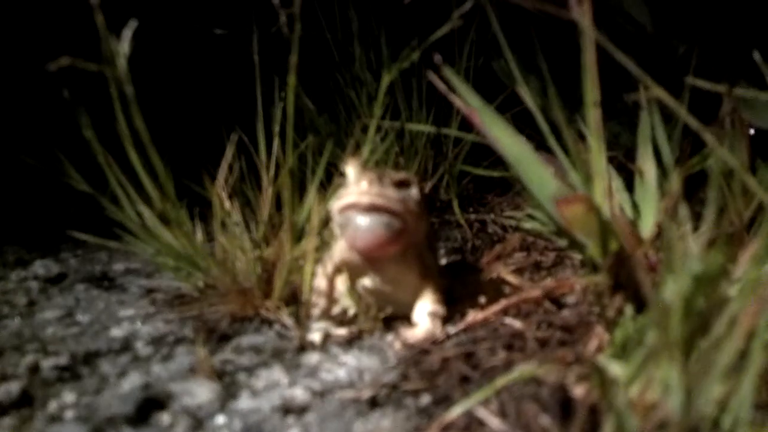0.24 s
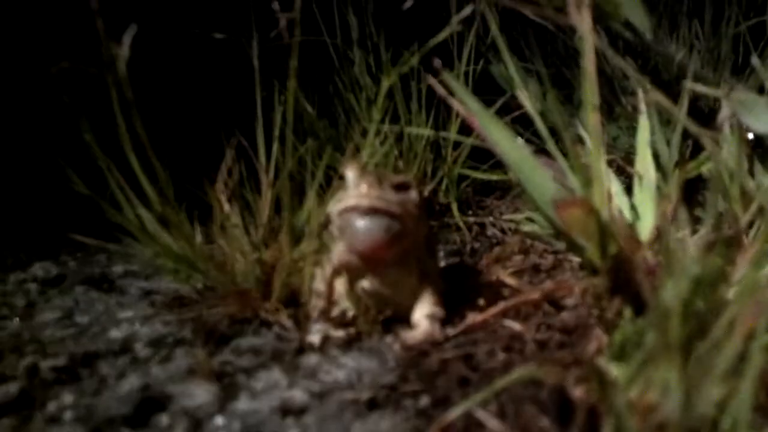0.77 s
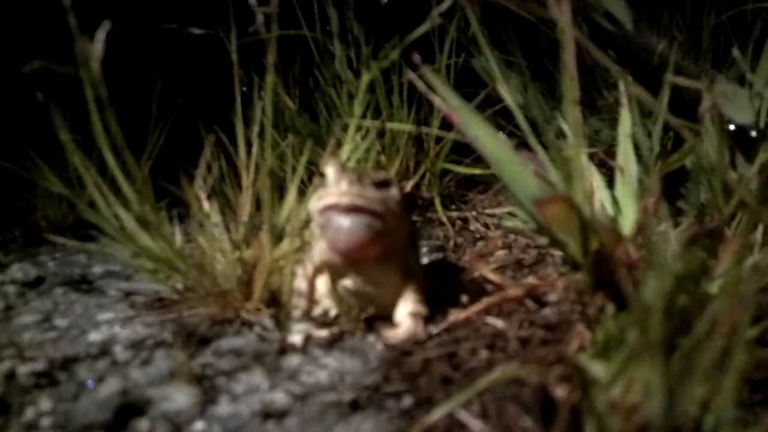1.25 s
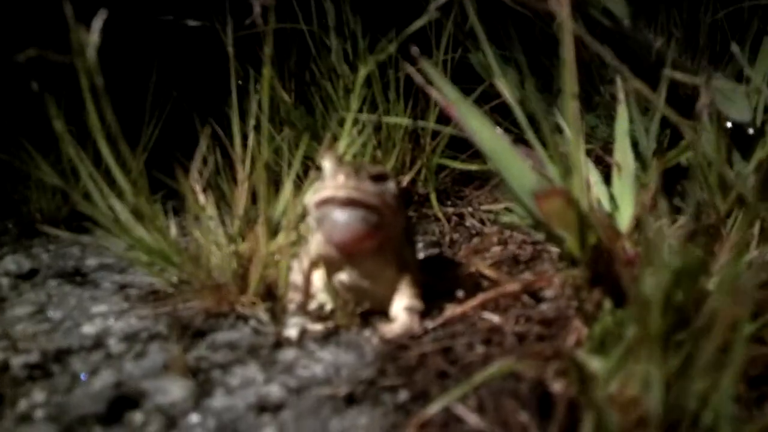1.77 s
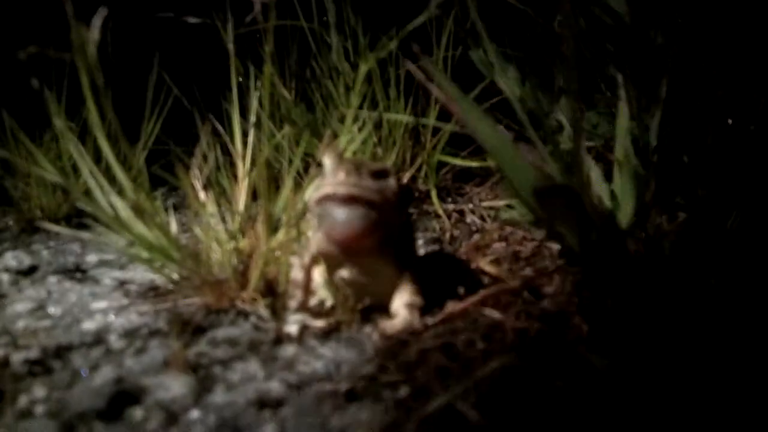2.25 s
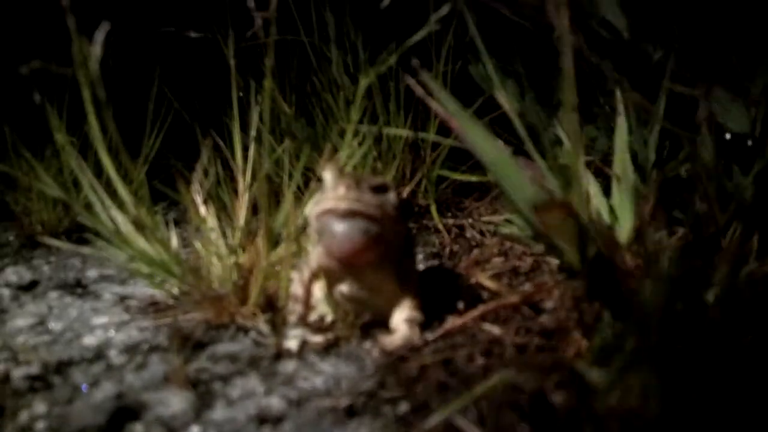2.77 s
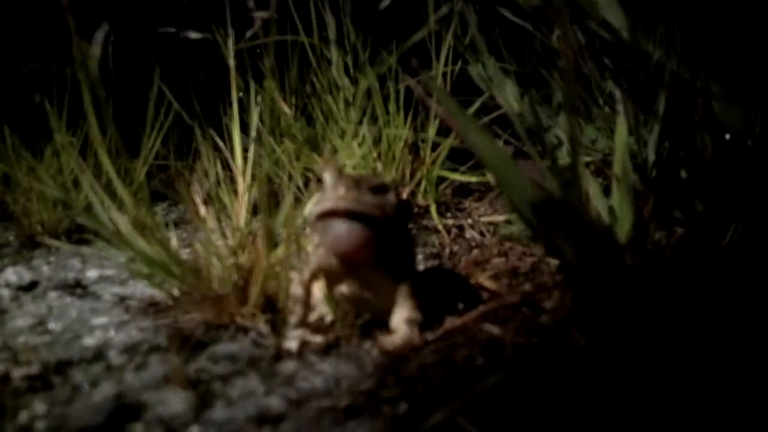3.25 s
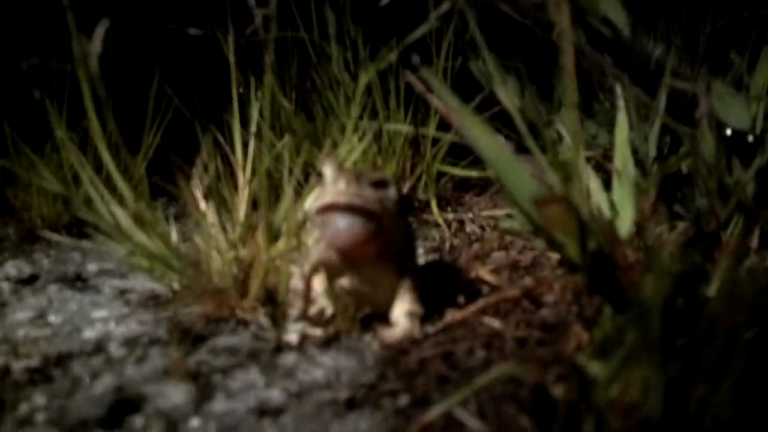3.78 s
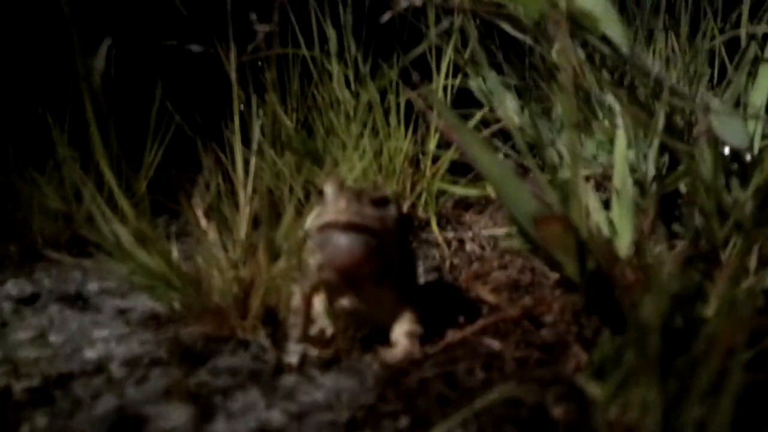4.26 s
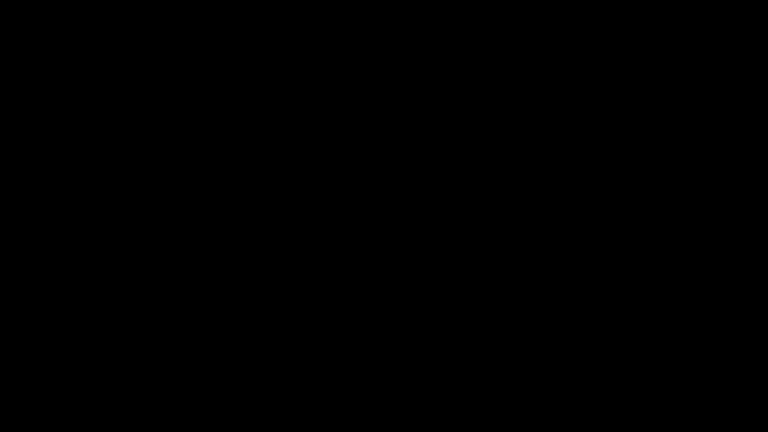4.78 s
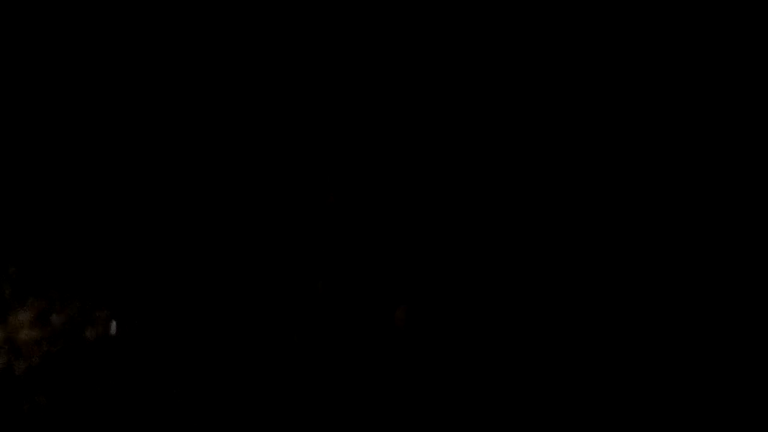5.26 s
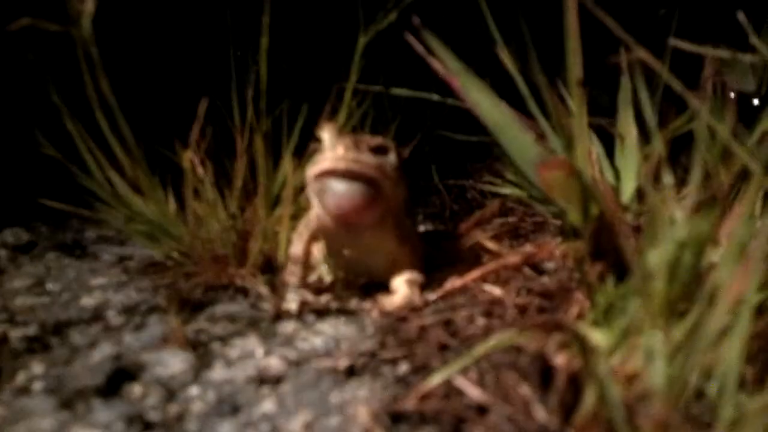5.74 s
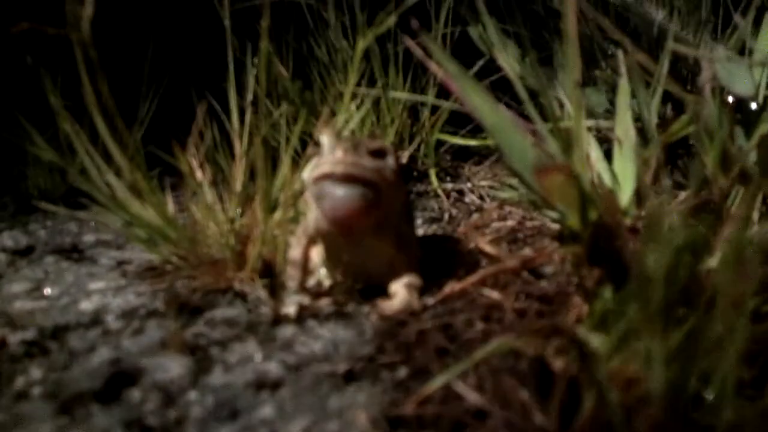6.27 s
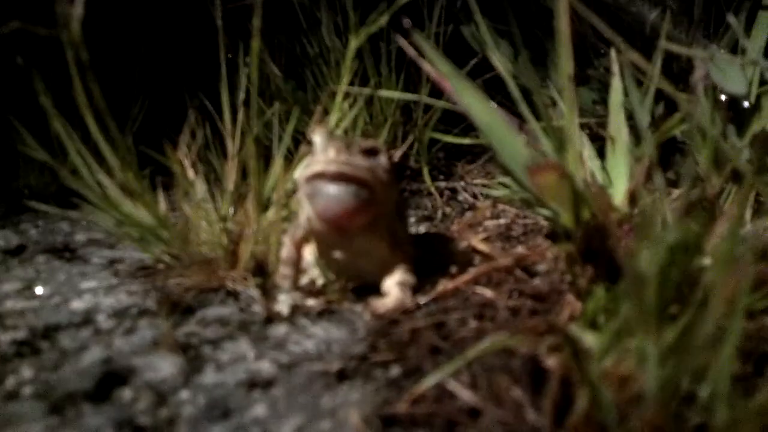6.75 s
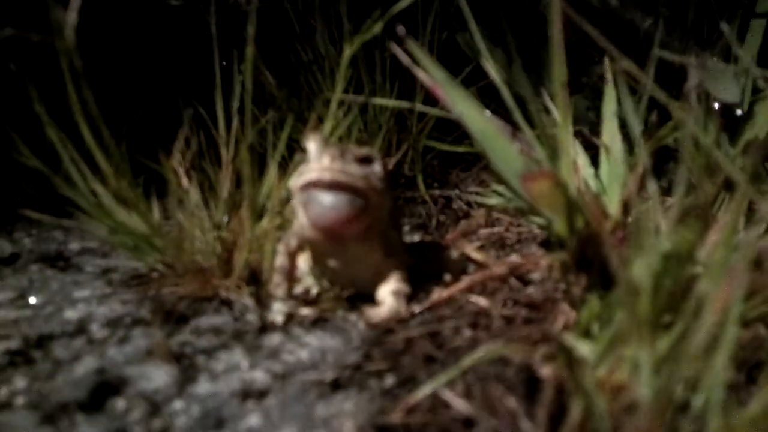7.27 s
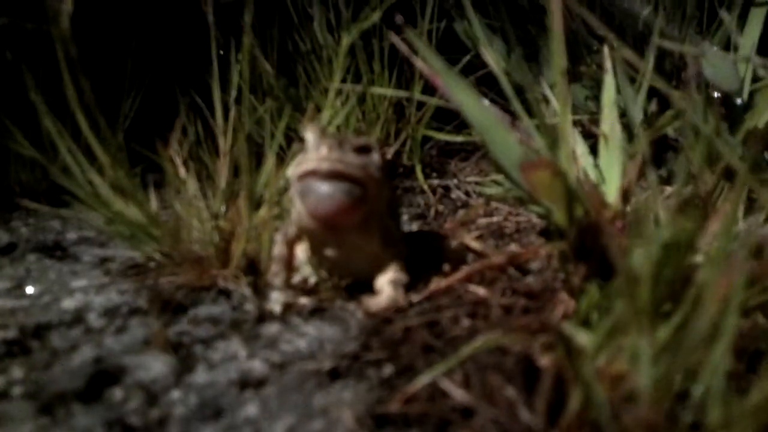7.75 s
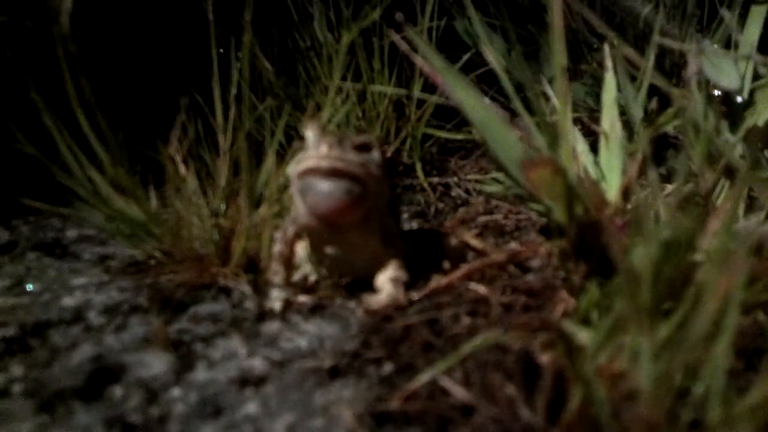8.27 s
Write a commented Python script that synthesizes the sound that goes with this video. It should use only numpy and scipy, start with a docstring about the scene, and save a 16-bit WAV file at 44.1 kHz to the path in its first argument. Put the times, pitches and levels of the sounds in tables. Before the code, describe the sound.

Continuous high insect trill, hissing katydids and throbbing far toads outdoors at night, with a faint motor-like drone and handheld torch clicks and bumps.

```python
"""A near cricket pulses through a night in wet grass: each wing stroke is a short tone that sags at its end.
Behind it are toads, katydids and far crickets, made of coloured noise that flickers and surges.
A low rumble is noise too; wavering drones and hums, likely far motors, are sine waves.
A hand clicks a torch and rubs its case, and soft bumps come before and between the clicks: dying
sines and bursts of noise. Two ports hear it; each channel is one port minus the other a moment later."""
import sys
import numpy as np
from scipy import signal
from scipy.fft import rfft, irfft, next_fast_len
from scipy.io import wavfile
from scipy.ndimage import uniform_filter1d

SR = 44100
rng = np.random.default_rng(int(sys.argv[2]) if len(sys.argv) > 2 else 0)


def store_pcm(level_fs):
    """Save levels as 16-bit WAV."""
    pcm = np.round(np.clip(level_fs, -1, 1) * 32767).astype(np.int16)
    wavfile.write(sys.argv[1], SR, np.atleast_2d(pcm).T)


N = 375732
TIME = np.arange(N) / SR

# Noise colours at the ports; only their shape counts, as the loudness is set later:
# (frequency [Hz], density [dB per Hz], left minus right port [dB], likeness of the ports [-1..1])
RUMBLE_COLOUR = [(113, -90.5, 3, 0.57), (134.4, -72, -2, 0.29), (141, -80.5, -1, .85),
                 (153, -70, -0.5, 0.8), (204, -74, -4.5, 0.56), (282, -75, 4.5, 0.41),
                 (395, -81, 4.5, 0.43), (477, -73.5, -9, 0.69), (544, -79, 3, 0.021),
                 (687, -76.5, -0.5, 0.034), (762, -88, 2, 0.58), (974, -86, -3, -0.54),
                 (1193, -88.5, 2, -0.5)]
DEEP_RUMBLE_COLOUR = [(29.8, -93, 0.29, .97), (70, -78, 0.33, 0.99), (105, -69.5, 1.4, 0.85),
                      (140.3, -73, 1, 0.85)]
TOAD_COLOUR = [(1190, -90, -7, 0.55), (1690, -85.5, -3, 0.44), (1930, -77, -0.5, 0.25),
               (2240, -81.5, -6.5, 0.44), (2410, -85.5, 26, 0.071), (2950, -80.5, -17, 0.16),
               (3800, -85, 0, 0.2), (4450, -82.5, 1.5, 0.13), (5070, -86.5, -4, 0.13),
               (5340, -85.5, 2.5, 0.11)]
FAR_CRICKET_COLOUR = [(5500, -91.5, 1, .1), (5830, -89.5, 3, 0.35), (6070, -85.5, 2.7, 0.24),
                      (6910, -99.5, 3.9, .1), (6920, -112, 1, .1)]
KATYDID_COLOUR = [(7930, -118, -17, 0.024), (8420, -116, -8, 0.013), (9710, -107.5, -35.5, 0.),
                  (11500, -105, -8.5, 0.011), (11740, -96.5, -18, 0.03), (13600, -90, -17.5, 0.),
                  (15200, -83, -16, 0.), (15500, -83.5, -18, 0.0044)]

# How the rumble swells: (time [s], level [dB])
RUMBLE_SWELL = [(0, -53.5), (0.9, -51.5), (2.5, -52.5), (4, -53.5), (6.2, -51), (7.4, -52.5), (8.52, -55)]
DEEP_RUMBLE_DB, DEEP_RUMBLE_RISE_DB_PER_S = -69, 0.27

# Pitch of the falling drone: (time [s], fundamental [Hz])
DRONE_PITCH = [(0, 86), (2.1, 85.5), (4, 84.5), (6.3, 83.5), (8.52, 81.5)]
# Its second partial: (time [s], level [dB])
DRONE_SECOND_SWELL = [(0, -61), (0.4, -66), (0.95, -62.5), (1.14, -56), (1.45, -58.5), (2.05, -51),
                      (2.35, -58), (2.55, -52.5), (3.2, -68), (3.7, -62), (3.95, -56), (4.4, -56),
                      (4.8, -57.5), (5.3, -62.5), (5.65, -56), (6.0, -64.5), (7.0, -69), (7.8, -55.5),
                      (8.3, -65), (8.52, -59)]
# Its fourth and sixth partials: (time [s], level of the fourth [dB], level of the sixth [dB])
DRONE_UPPER_SWELL = [(0, -68, -69), (0.5, -66, -61), (0.85, -54.5, -60), (1.15, -67, -59),
                     (1.6, -56, -60.5), (2.1, -65, -64), (2.5, -70, -70), (2.9, -62.5, -57),
                     (3.5, -66.5, -62), (4.2, -66, -73), (4.8, -63, -80), (5.2, -60.5, -73),
                     (5.45, -70, -72), (5.7, -61, -76), (6.1, -68, -66), (7, -70.5, -59), (8.52, -73, -83)]
# Its highest partials: (multiple of the fundamental, level [dB])
DRONE_HIGH_PARTIALS = [(7, -71), (8, -67), (9, -72)]
# The steady drone's partials, before its swell: (multiple of the fundamental, level [dB])
STEADY_PARTIALS = [(2, -64.5), (4, -71.5), (6, -67), (8, -71.5)]
STEADY_HZ = 75.33
# How the steady drone swells: (time [s], level added to every partial [dB])
STEADY_SWELL = [(0, 3), (0.25, 7.5), (0.7, -2.5), (1.15, 6.5), (1.5, -6), (2.0, 3.5), (2.6, 1.5),
                (2.9, 0.5), (3.4, 5.5), (3.8, -1), (4.4, 0.5), (5.2, -7.5), (6.2, -1), (7.4, 2), (8.52, 2)]
# Two lone hums that come and go: (time [s], low hum level [dB], high hum level [dB])
HUM_SWELL = [(0, -71, -76), (0.5, -70, -61), (1.0, -70, -58), (1.7, -74, -68), (2.0, -67.5, -71),
             (3.0, -70, -59), (3.5, -74, -75), (4.2, -66.5, -72), (5.3, -68, -68), (6.0, -67, -75),
             (6.6, -69, -64), (7.3, -64, -69.5), (8.0, -61.5, -66), (8.52, -62, -64)]
HUM_HZ = (132.1, 252)  # low, high
WAVER_DB = 3  # the faint lines break up

# Surges of the chorus, when nearer katydids join in and sing across the treble and the middle band: # (start
# [s], length [s], treble level [dB], middle band level [dB])
SURGES = [(0.07, 0.49, -56.5, -52), (0.675, 0.41, -57, -50.5), (1.25, 0.59, -66, -58.5),
          (1.778, 0.54, -56, -50.5), (2.501, 0.98, -62.5, -55), (3.367, 0.49, -58, -54),
          (4.003, 1.13, -60, -54), (5.156, 0.48, -57.5, -54.5), (5.644, 0.47, -73, -53),
          (6.363, 0.49, -57, -52), (6.98, 0.42, -75, -53.5), (7.465, 0.51, -65, -53),
          (8.093, 0.52, -58.5, -53)]
SURGE_RISE_S, SURGE_FALL_S = 0.14, 0.21
KATYDID_BED_DB, TOAD_BED_DB, FAR_CRICKET_DB = -61, -51, -59
TOAD_THROB_DB, TOAD_THROB_PER_S = 1.3, 15  # random throb: spread, new levels a second

# Torch clicks, each with its own pitch and ring time:
# (time [s], snap level [dB], knock level [dB], tick level [dB],
#   snap at the right port as a share of the left [-1..1], knock likewise [-1..1],
#   knock pitch [factor], knock ring time [factor])
CLICKS = [(4.378, -35, -33, -46, .36, 0.7, 1.4, 0.58), (4.93, -40, -38, -48, .3, .6, 1.3, 0.35),
          (4.937, -36, -35.5, -45, .31, 0.54, 2.15, 0.23), (4.947, -44, -41, -48, .3, .6, 1., .4),
          (4.956, -45, -37, -56, .3, .6, 0.86, .5), (4.967, -45, -42, -52, .3, .6, 1.2, .4),
          (4.9832, -39, -36, -45, .2, 0.55, 1.2, .25), (5.009, -39, -27.5, -40, .1, .6, 0.81, 0.35),
          (5.5846, -29.5, -32.5, -44, 0.18, 0.32, 1.92, 0.38),
          (6.1548, -32, -27, -35, .3, 0.62, 1.24, 0.33), (6.1572, -31, -40, -44, .1, .6, 1.2, .4),
          (6.1622, -35, -27, -31, .2, 0.48, 1.6, 0.42), (6.1675, -22.5, -27.5, -35, 0.28, 0.66, 1.06, 0.93),
          (6.181, -42, -43, -47, .2, .6, 1.5, .4), (6.1881, -18.5, -22, -38, -.25, 0.56, 1.05, 0.4),
          (6.1935, -32, -39, -46, .2, .3, 1.5, 0.44), (6.197, -24, -45, -34, .1, .6, 1.4, 0.45),
          (6.2031, -36, -29, -39, .2, 0.65, 0.48, .8), (6.224, -44, -35, -56, .2, 0.5, 0.99, 0.97)]
# Ringing of the snap: (frequency [Hz], level [dB], time to die by 60 dB [s])
SNAP_MODES = [(2755, -2.5, 0.014), (2144, -8.5, 0.012), (3960, -6.5, 0.0063), (5800, -6, 0.005)]
# Ringing of the knock before the factors: (frequency [Hz], level [dB], time to die by 60 dB [s])
KNOCK_MODES = [(573, -8, 0.038), (499, 8, 0.028), (421, 19, 0.025)]
# Soft bumps: (time [s], peak level at the left port [dB])
BUMPS = [(1.673, -35), (4.378, -41), (5.008, -36), (5.086, -48), (5.156, -38), (5.748, -39)]
# Ringing of a bump: (frequency [Hz], level [dB], time to die by 60 dB [s])
BUMP_MODES = [(249, 7, 0.069), (312, 0, 0.035), (182, -4, 0.063)]
# Fingers sliding on the case:
# (time [s], length [s], level [dB], top of the dull part [Hz], gain of the added treble [dB])
RUSTLES = [(0.982, 0.069, -52.5, 1800, -45), (4.357, 0.033, -52, 1500, -18),
           (4.915, 0.12, -53.5, 2100, -13), (6.14, 0.035, -48.5, 1190, 3), (6.185, 0.022, -45, 1000, -6)]
TREBLE = signal.butter(1, 5000, "highpass", fs=SR, output="sos")  # ticks and rubbing are thin and bright

# The near cricket: (time [s], level [dB], pulses ahead of the steady beat [cycles])
CRICKET_SONG = [(0, -50, 0.06), (1, -49, 0.07), (1.5, -50, 0.064), (1.9, -49, 0.014), (2.75, -48.5, 0.045),
                (3.75, -49, 0.0045), (4.25, -48.5, 0.0044), (5.1, -49, .007), (5.75, -49.5, 0.026),
                (6.15, -49.5, 0.07), (6.4, -49.5, 0.092), (7.25, -48.5, 0.077), (7.75, -49.5, 0.075),
                (8.52, -49, 0.0016)]
CRICKET_RATE_HZ, CRICKET_FIRST_S = 43.72, 0.0050
# One wing stroke before its random changes: (time from its start [s], level [dB], pitch [Hz])
STROKE = [(0., -40, 6430), (.0009, -15, 6430), (.0018, -5, 6420), (.0028, -2.5, 6405), (.0047, 0, 6390),
          (.0064, 0, 6355), (.0078, -1, 6300), (.0088, -3.5, 6230), (.0097, -7, 6160), (.0107, -13, 6130),
          (.012, -26, 6120)]
STROKE_SCATTER_DB, STROKE_STRETCH = 0.85, 0.045  # spread of strength and of length between strokes

PORT_DELAY = 16  # samples
TOP_HZ = 15500


def undb(db):
    """Turn decibels into gain."""
    return 10 ** (np.asarray(db) / 20)


def curve(rows):
    """Draw straight lines through each column of a time table, one value a sample."""
    s, *columns = np.transpose(rows)
    return [np.interp(TIME, s, column) for column in columns]


def walk(rate):
    """Wander at random: about `rate` new levels a second, smoothed twice, with a spread near 1."""
    hold = int(SR / rate)
    steps = np.repeat(rng.standard_normal(N // hold + 1), hold)
    smooth = uniform_filter1d(uniform_filter1d(steps, hold), hold)
    return 0.94 * smooth[:N]


def widen(ports):
    """Take from each port the other port a moment earlier, which makes a comb of notches."""
    return ports - np.roll(ports[::-1], PORT_DELAY, axis=1)  # the other port is delayed


def level(ports, db):
    """Bring the centre of the widened pair to rms 1, then apply the level."""
    centre = widen(ports).mean(axis=0)
    return ports * undb(db) / np.sqrt(np.mean(centre ** 2))


def hiss(colour, flicker_db, rate, lag_s=0):
    """Coloured noise, lag_s later at the left port; the band round each table row flickers on its own."""
    size = next_fast_len(N)
    hz, db, pan_db, like = np.transpose(colour)
    bin_hz = np.maximum(np.arange(size // 2 + 1) * SR / size, 1)
    at, rows_at = np.log(bin_hz), np.log(hz)
    gain = undb(np.interp(at, rows_at, db))
    pan = np.interp(at, rows_at, pan_db)
    like = np.interp(at, rows_at, np.clip(like, -1, 1))
    # a shared part and an opposite part set how alike the ports are
    mid, side = rfft(rng.standard_normal((2, size)))
    mid, side = mid * np.sqrt(1 + like), side * np.sqrt(1 - like)
    left = undb(pan / 2) * (mid + side) * np.exp(-2j * np.pi * bin_hz * lag_s)
    right = undb(-pan / 2) * (mid - side)
    spectra = gain * np.array([left, right])
    out = np.zeros((2, N))
    for one in np.eye(len(hz)):
        band = np.interp(at, rows_at, one, left=0, right=0)
        out += undb(flicker_db * walk(rate)) * irfft(spectra * band, size)[:, :N]
    return out


def ring(modes, rise_s, count=2600):
    """Dying sines after a push that builds up over about rise_s, with peak 1."""
    t = np.arange(count) / SR
    y = sum(undb(db) * np.sin(2 * np.pi * hz * t) * 1000. ** (-t / t60) for hz, db, t60 in modes)
    y = y * (1 - np.exp(-t / rise_s)) ** 2
    return y / np.abs(y).max()


def add(ports, s, sound):
    """Mix a short sound in at time s."""
    i = int(s * SR)
    ports[:, i:i + sound.shape[1]] += sound


def rumble():
    """Low noise that swells, over a deepest layer that slowly grows and wavers."""
    swelling = level(hiss(RUMBLE_COLOUR, 1.35, 6), curve(RUMBLE_SWELL)[0])
    deep_db = DEEP_RUMBLE_DB + DEEP_RUMBLE_RISE_DB_PER_S * TIME + 1.3 * walk(3.3)
    return swelling + level(hiss(DEEP_RUMBLE_COLOUR, 0.77, 2.5), deep_db)


def partial(turns, db, waver_db, wander, lag_s):
    """One sine line that wavers in level and phase and reaches the right port later."""
    phase = 2 * np.pi * turns + wander * walk(8)  # wander in radians
    lag = np.gradient(phase) * SR * lag_s
    ports = np.array([np.sin(phase), np.sin(phase - lag)])
    return level(ports, db + waver_db * walk(9))


def falling_drone():
    """A slowly falling stack of sine lines; the second partial wanders least."""
    turns = np.cumsum(curve(DRONE_PITCH)[0]) / SR
    out = partial(2 * turns, curve(DRONE_SECOND_SWELL)[0], 1.6, 0.4, lag_s=0.00014)
    for k, db in zip((4, 6), curve(DRONE_UPPER_SWELL)):
        out += partial(k * turns, db, WAVER_DB, 0.55 * k, lag_s=0.0001)
    for k, db in DRONE_HIGH_PARTIALS:
        out += partial(k * turns, db, 4.8, 1.67, lag_s=0.00025)
    return out


def steady_drone():
    """Partials of one fixed pitch that swell together and waver apart."""
    swell_db = curve(STEADY_SWELL)[0]
    return sum(partial(k * STEADY_HZ * TIME, db + swell_db, 2.5, 1.16, lag_s=0.0001)
               for k, db in STEADY_PARTIALS)


def hums():
    """Two lone sine lines that come and go, each at its own pitch."""
    return sum(partial(hz * TIME, db, WAVER_DB, 2.05, lag_s=0.00014)
               for hz, db in zip(HUM_HZ, curve(HUM_SWELL)))


def far_crickets():
    """Far singers blur into a band of fast flickering noise."""
    return level(hiss(FAR_CRICKET_COLOUR, 4.1, 60), FAR_CRICKET_DB)


def chorus_levels():
    """Levels in dB of the treble and the middle band: a steady bed of katydids and of toads, with the power of
    every surge added."""
    power = undb(2 * np.array([[KATYDID_BED_DB], [TOAD_BED_DB]])) * np.ones(N)  # doubled dB gives power
    for s, length, *db in SURGES:
        rise = (TIME - s) / SURGE_RISE_S
        fall = (s + length - TIME) / SURGE_FALL_S
        shape = np.clip(np.minimum(rise, fall), 0, 1)
        power = power + undb(2 * np.array(db))[:, None] * shape
    return 10 * np.log10(power)


def katydids(db):
    """A high hiss: noise with a quick random flicker."""
    return level(hiss(KATYDID_COLOUR, 1.0, 25) * undb(1.8 * walk(36)), db)


def toads(db):
    """A far chorus: mid-pitched noise that throbs and reaches the left port later."""
    throb = undb(TOAD_THROB_DB * walk(TOAD_THROB_PER_S))
    return level(hiss(TOAD_COLOUR, 0.75, 11, lag_s=0.0003415) * throb, db)


def bumps():
    """Soft dull knocks that shake both ports, made of low dying sines."""
    out = np.zeros((2, N))
    for s, db in BUMPS:
        add(out, s, undb(db) * np.array([[1], [0.7]]) * ring(BUMP_MODES, 0.0016))
    return out


def rustle(grain_db=2.5):
    """Fingers slide on the case: grainy rubbing noise, unrelated at the two ports."""
    out, t = np.zeros((2, N)), np.arange(5300) / SR
    grain = undb(grain_db * walk(300))
    for s, length, db, top_hz, treble_db in RUSTLES:
        grit = rng.standard_normal((2, len(t)))
        body_band = signal.butter(2, [360, top_hz], "bandpass", fs=SR, output="sos")
        body = signal.sosfilt(body_band, grit)
        treble = undb(treble_db) * signal.sosfilt(TREBLE, grit)
        swell = np.sin(np.pi * np.clip(t / length, 0, 1))
        add(out, s, undb(db) * swell * (body / body.std() + treble))
    return out * grain


def torch_clicks(scuff_db=-16):
    """Plastic snaps and knocks ring mostly at the left port, with noise for the tick and the scuff."""
    out, t = np.zeros((2, N)), np.arange(2600) / SR
    scuff_band = signal.butter(2, [1700, 4800], "bandpass", fs=SR, output="sos")
    for s, snap_db, knock_db, tick_db, snap_share, knock_share, pitch, ring_time in CLICKS:
        tick_grit, scuff_grit = rng.standard_normal((2, 2, len(t)))
        tick_shape = (1 - np.exp(-t / 0.0014)) * 1000. ** (-t / 0.021)
        tick = undb(tick_db) * signal.sosfilt(TREBLE, tick_grit) * tick_shape
        # the finger slides on after the click
        scuff_gain = undb(max(snap_db, knock_db) + scuff_db)
        scuff = scuff_gain * signal.sosfilt(scuff_band, scuff_grit) * 1000. ** (-t / 0.1)
        snap = undb(snap_db) * ring(SNAP_MODES, 0.00024)
        knock_modes = np.multiply(KNOCK_MODES, (pitch, 1, ring_time))
        knock = -undb(knock_db) * ring(knock_modes, 0.00088)  # pushes the opposite way
        add(out, s, np.outer([1, snap_share], snap) + np.outer([1, knock_share], knock) + tick + scuff)
    return out


def near_cricket(slip=0.84, flutter_db=-0.5, pan_db=10.5, lag_turns=0.034):
    """Regular wing strokes, each a tone that sags at its end; teeth catch unevenly."""
    db, ahead = curve(CRICKET_SONG)
    beat = (TIME - CRICKET_FIRST_S) * CRICKET_RATE_HZ + ahead + 1
    stroke, since = beat.astype(int), beat % 1 / CRICKET_RATE_HZ
    # every stroke draws its own pitch, phase slip, strength and length
    detune, slips, strength, stretch = rng.standard_normal((stroke.max() + 1, 4)).T
    since = since / (1 + STROKE_STRETCH * np.clip(stretch[stroke], -2, 2))
    s, shape_db, hz = np.transpose(STROKE)
    pitch = np.interp(since, s, hz) * (1 + 0.00292 * detune[stroke])
    # the wing keeps only a loose memory of its phase from stroke to stroke
    phase = 2 * np.pi * np.cumsum(pitch) / SR + np.cumsum(slip * slips)[stroke]
    size_db = np.interp(since, s, shape_db, right=-80) + STROKE_SCATTER_DB * strength[stroke]
    size = undb(size_db + flutter_db * walk(220))
    size = uniform_filter1d(size, size=SR // 1500)  # the wing starts and stops without a tick
    left = np.sin(phase)
    right = undb(-pan_db) * np.sin(phase - 2 * np.pi * lag_turns)
    return level(size * np.array([left, right]), db)


def scene():
    """Everything as it reaches the two ports."""
    katydid_db, middle_db = chorus_levels()
    background = rumble() + falling_drone() + steady_drone() + hums()
    animals = far_crickets() + katydids(katydid_db) + toads(middle_db)
    hand = rustle() + torch_clicks()
    return background + animals + bumps() + hand + near_cricket()


def record(dry):
    """Widen the port pair to stereo and cut the top of the treble."""
    low_pass = signal.ellip(12, 0.3, 70, TOP_HZ, fs=SR, output="sos")
    return signal.sosfilt(low_pass, widen(dry))


dry = scene()
out = record(dry)
store_pcm(out)
```